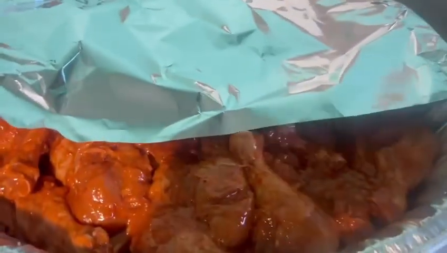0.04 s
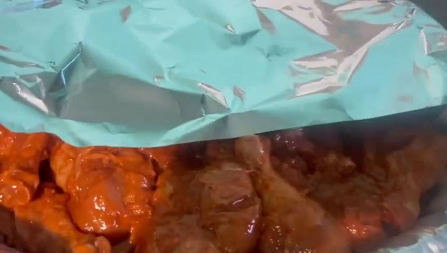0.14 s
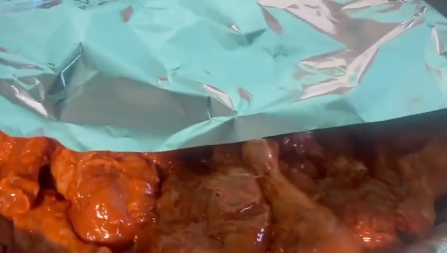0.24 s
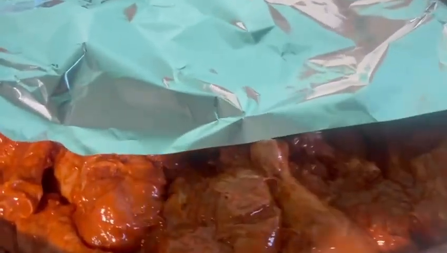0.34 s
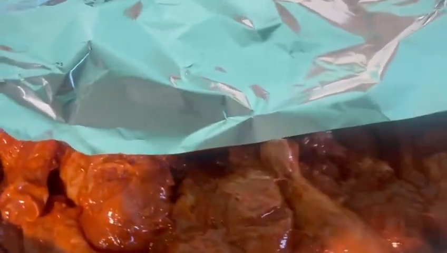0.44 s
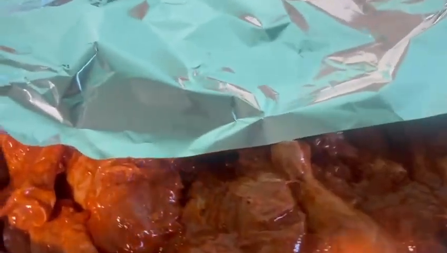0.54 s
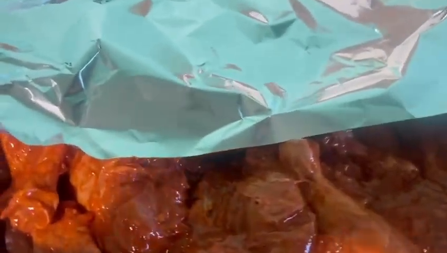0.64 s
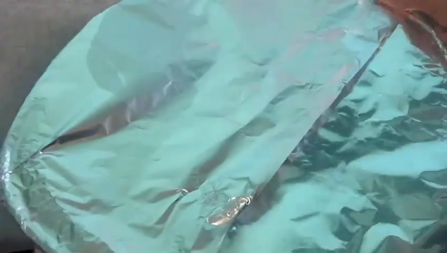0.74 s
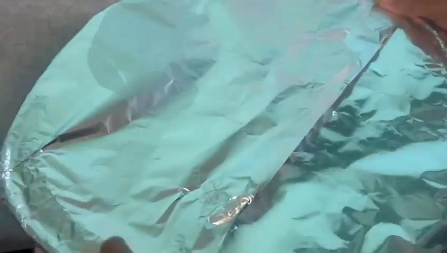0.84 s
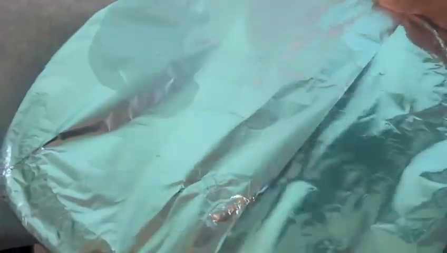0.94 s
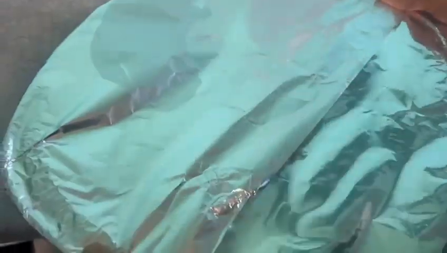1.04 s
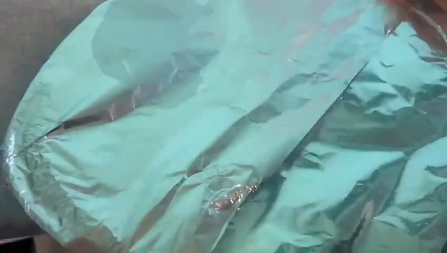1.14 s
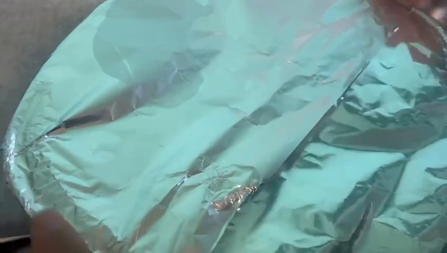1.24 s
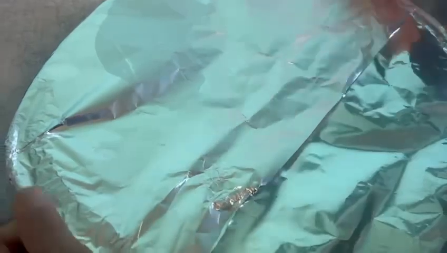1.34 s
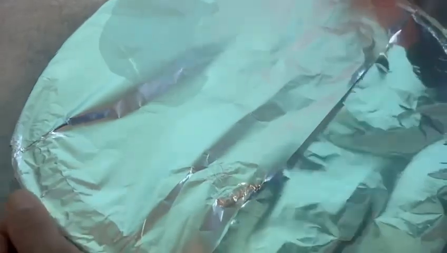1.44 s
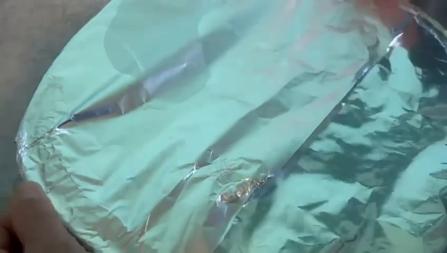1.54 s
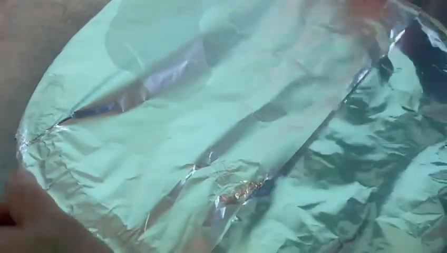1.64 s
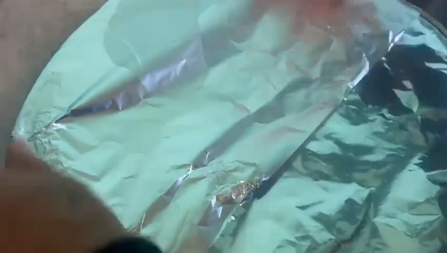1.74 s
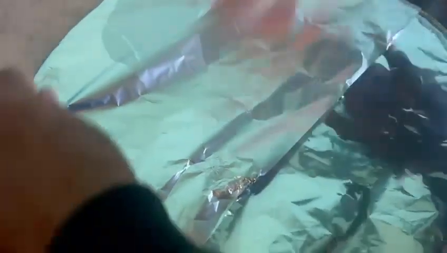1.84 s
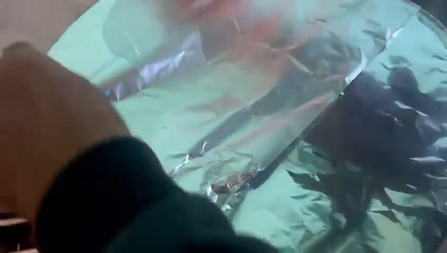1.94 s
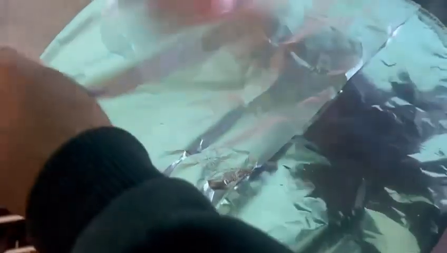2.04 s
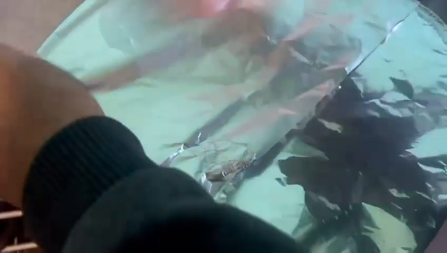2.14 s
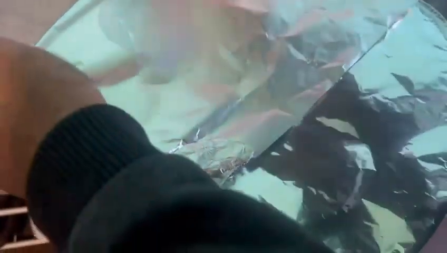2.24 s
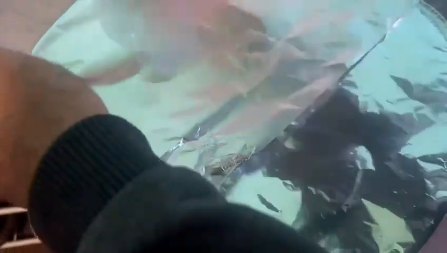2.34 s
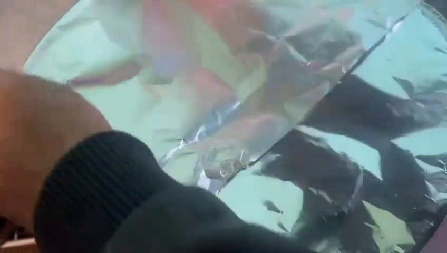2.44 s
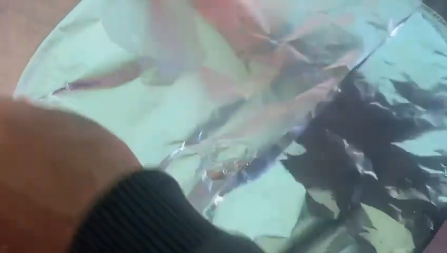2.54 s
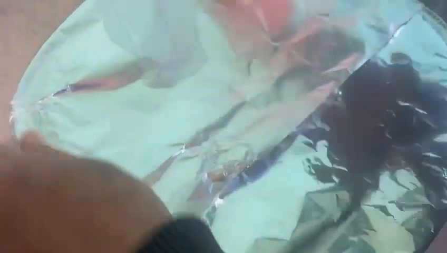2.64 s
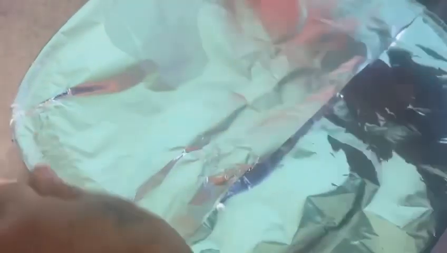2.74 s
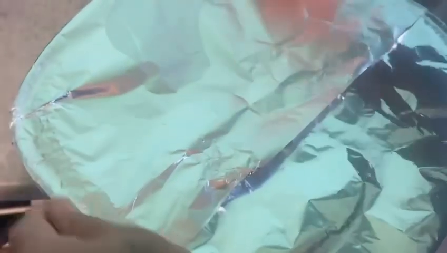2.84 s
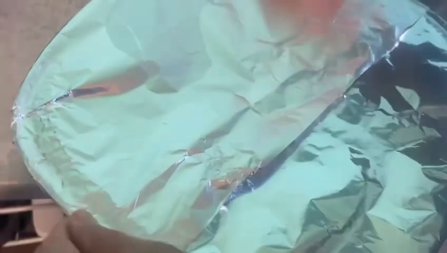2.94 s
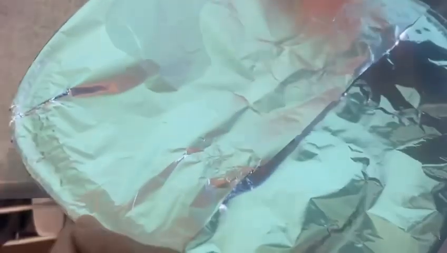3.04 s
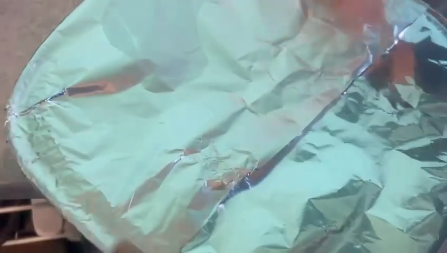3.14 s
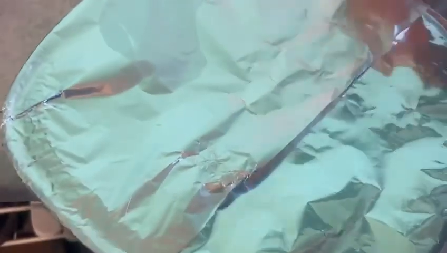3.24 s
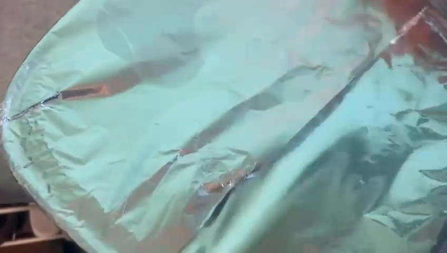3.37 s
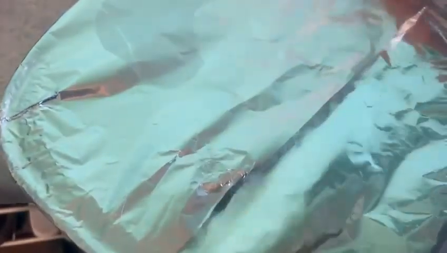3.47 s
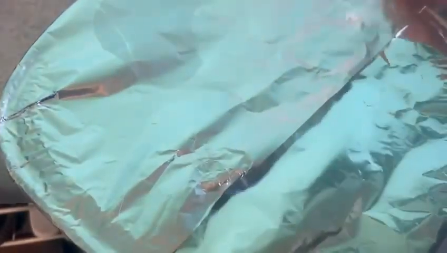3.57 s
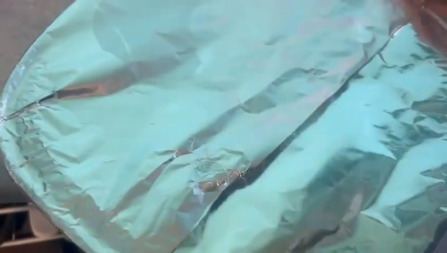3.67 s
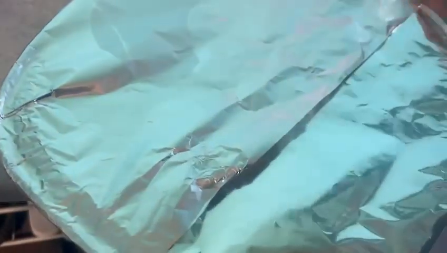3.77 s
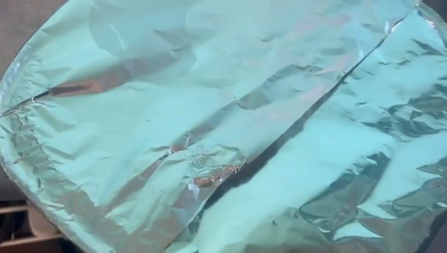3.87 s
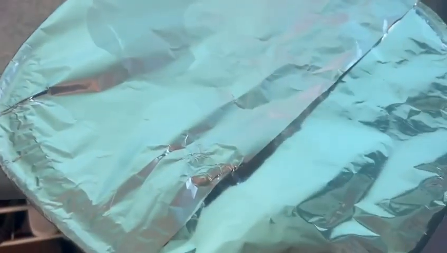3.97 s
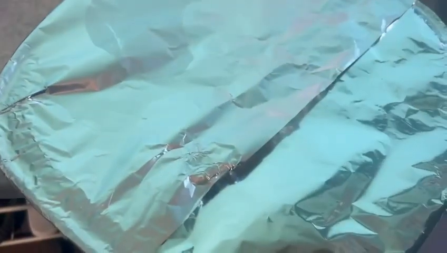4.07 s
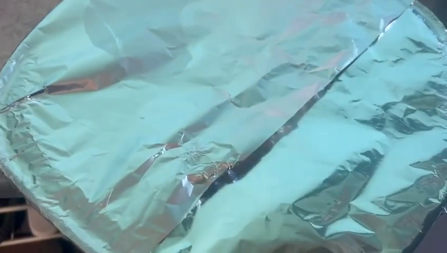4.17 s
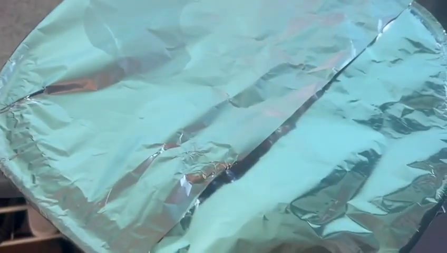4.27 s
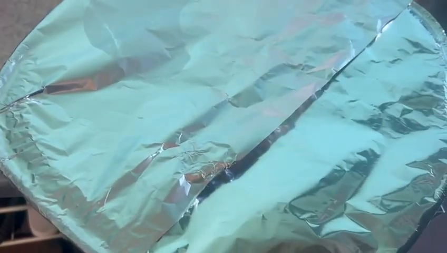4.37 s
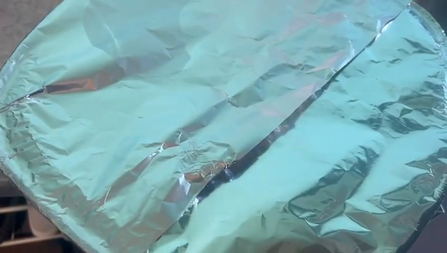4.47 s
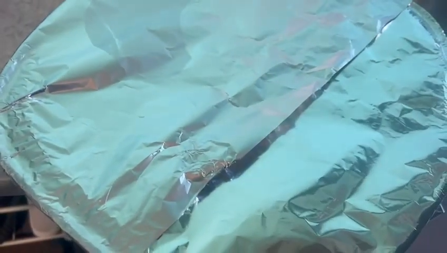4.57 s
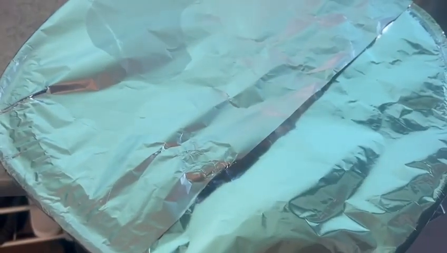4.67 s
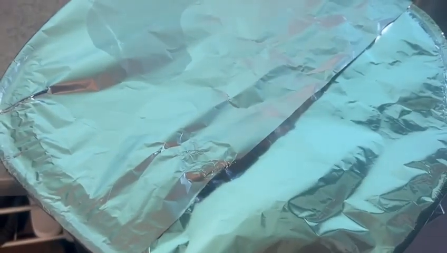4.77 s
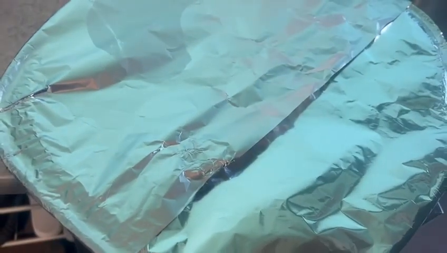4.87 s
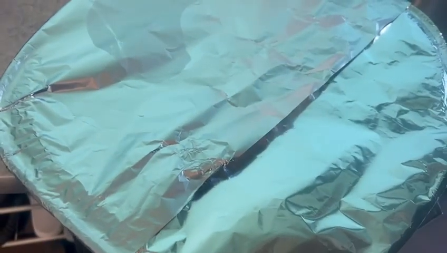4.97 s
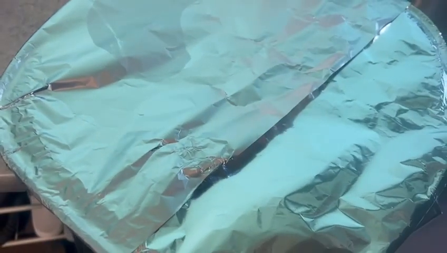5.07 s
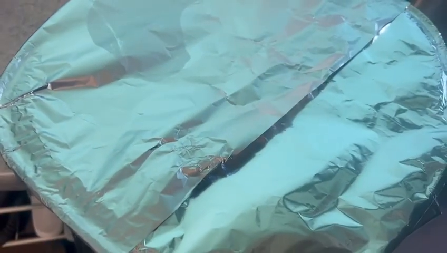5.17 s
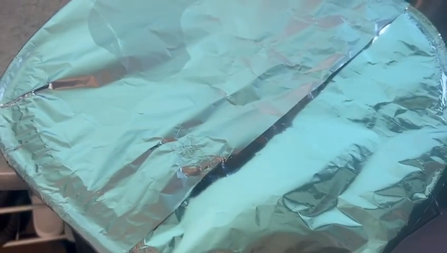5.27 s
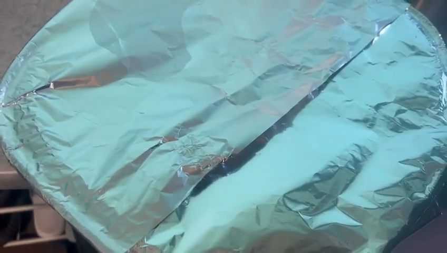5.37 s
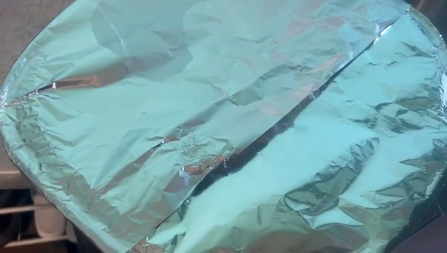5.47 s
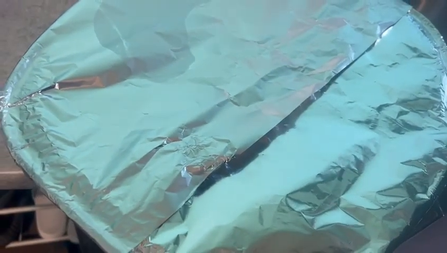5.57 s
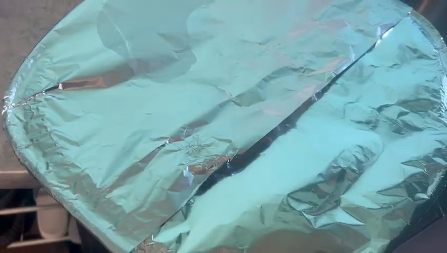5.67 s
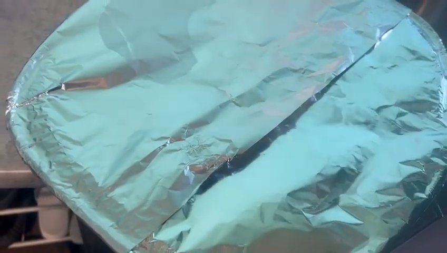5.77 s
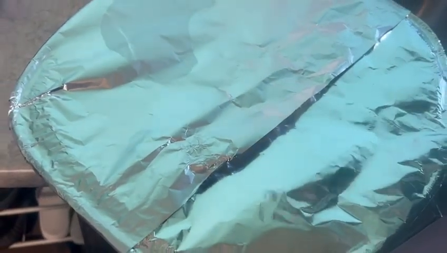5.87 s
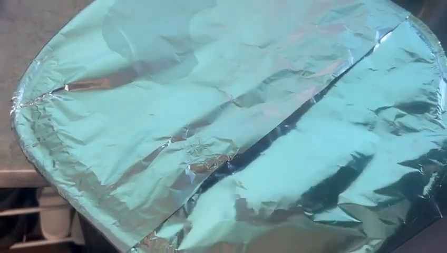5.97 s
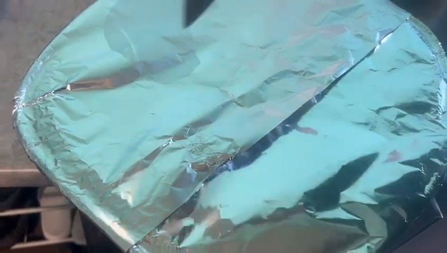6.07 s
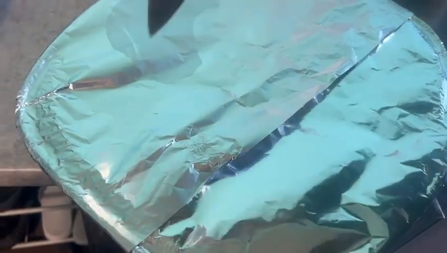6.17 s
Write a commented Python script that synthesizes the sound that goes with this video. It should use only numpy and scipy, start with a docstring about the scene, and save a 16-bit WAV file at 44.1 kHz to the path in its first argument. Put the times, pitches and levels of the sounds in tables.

```python
"""A small kitchen, the microphone close to a tray of aluminium foil, a fridge humming farther off.
After a few faint ticks the sound cuts to a brief silence and resumes with a fan running. Hands spread
the foil and crimp it round the rim: each press sets off tiny buckles, creases snap and dents pop.
Past four seconds a cupboard door knocks shut across the room and its panel rings. Thin metal then
scrapes and rings over there, and at the end the foil is touched again, close up."""
import sys
import numpy as np
from scipy import signal
from scipy.fft import rfft, irfft, next_fast_len
from scipy.io import wavfile
from scipy.ndimage import uniform_filter1d, map_coordinates

SR = 44100
rng = np.random.default_rng(int(sys.argv[2]) if len(sys.argv) > 2 else 0)


def master(y):
    """Save y as 16-bit WAV."""
    cut = np.clip(np.atleast_2d(y).T, -1, 1)
    pcm = np.round(cut * 32767)  # scale
    wavfile.write(sys.argv[1], SR, pcm.astype(np.int16))


N = 273861

# Room tone before the fan, and the fan's rush of air. Each row: frequency in Hz, relative level in dB.
ROOM_TONE_SPECTRUM = [(20, -34), (45, -19), (75, -1), (100, 1.5), (135, -14.5), (240, -7), (300, -7.5),
                      (380, -19), (550, -20), (1200, -29), (3000, -40.5), (8000, -44), (9500, -71.5)]
FAN_RUSH_SPECTRUM = [(20, -28.5), (40, -15), (62, -4.5), (85, -2), (120, -5.5), (170, -12.5), (250, -4.5),
                     (330, -9.5), (420, -13), (560, -17), (800, -22.5), (1200, -24.5), (2000, -32),
                     (4000, -42), (8000, -45), (10000, -81.5)]
# Motor tones across the room. Each row: frequency in Hz, base level in dB.
FRIDGE_TONES = [(96, -63.5), (188, -69), (285, -55.5)]
FAN_TONES = [(109.5, -50), (264, -53.5), (393, -64), (522, -69.5)]
# The fan's hum swells and sinks. Each row: time in seconds, gain in dB.
FAN_SWELL = [(0.7, 0.5), (1.2, 0.5), (2.0, 1.5), (2.8, -1), (3.4, -8), (4.0, -5.5), (4.6, 4), (5.2, -0.5),
             (6.21, 4.5)]

# Fingers press the foil, close up. Each row: start in seconds, length in seconds,
# crackle level in dB, flexing of the sheet in dB relative to the crackle.
FOIL_PRESSES = [(-0.02, 0.029, -52, 0.5), (0.675, 0.067, -33, -6), (0.72, 0.13, -33, -5),
                (0.874, .06, -20.5, -8), (0.925, .085, -24.5, -10), (1.054, 0.12, -26.5, -11),
                (1.294, 0.019, -34.5, -15), (1.328, 0.054, -33, -8), (1.417, 0.034, -18.5, -12),
                (1.431, 0.097, -22, -12.5), (1.591, 0.059, -27.5, -8), (1.668, 0.017, -26, -12.5),
                (1.791, 0.021, -33, -7), (1.985, 0.02, -29, -5), (1.991, 0.21, -25.5, -7.5),
                (2.003, 0.052, -20.5, -9.5), (2.136, 0.21, -26.5, -10.5), (2.329, .092, -23, -10),
                (2.427, 0.1, -25, -13), (2.545, .1, -24.5, -8), (2.675, .033, -27, -7),
                (2.738, 0.031, -28, -7), (2.769, 0.1, -37, 0), (2.925, 0.01, -34, -6.5),
                (2.959, .039, -37.5, -3), (3.068, 0.058, -38.5, -4), (3.17, .045, -44.5, 3),
                (3.215, .11, -25.5, -8), (3.333, 0.058, -20, -9), (3.391, 0.1, -30.5, -11.5),
                (3.492, 0.027, -27, -15.5), (3.6, 0.056, -31, -10.5), (3.69, 0.061, -24.5, -14),
                (3.732, 0.071, -35.5, -12.5), (5.772, .04, -52.5, 3), (5.934, .045, -44.5, -2.5),
                (5.975, 0.019, -33, -9), (6.068, 0.036, -29.5, -13), (6.128, 0.041, -37.5, -7.5)]
# Single creases snap through. Each row: start in seconds, relative level in dB.
CREASE_SNAPS = [(0.289, -58), (0.7143, -27), (1.1688, -16), (1.3027, -17), (1.3416, -15), (1.4474, -8),
                (1.6395, -8), (2.8537, -18), (2.866, -18), (2.93, -16.5), (2.987, -24), (3.062, -26),
                (3.1009, -21), (3.1294, -20.5), (3.2398, -18), (3.6283, -19), (3.714, -8.5), (5.9823, -22),
                (5.9943, -13), (6.0696, -20)]
# Tiny facets crinkle and the wider sheet flexes. Each row: frequency in Hz, relative level in dB.
CRINKLE_SPECTRUM = [(700, -41.5), (1500, -11.5), (2300, -5), (3300, -3), (4400, -1.5), (5500, -3),
                    (6600, -1.5), (7600, 1), (8500, 0.5), (9400, -2), (10800, -2.5), (11600, -2),
                    (12200, -31.5)]
FLEX_SPECTRUM = [(80, -17), (200, -0.5), (400, -5), (550, -3.5), (850, -1), (1250, 0.5), (1800, -6),
                 (2600, -5.5), (5000, -17.5)]
# Sheet and tray pop in and out. Each row: start in seconds, level in dB,
# a pitch in Hz that the note falls through, thud in dB relative to the note.
DENT_POPS = [(0.151, -51, 1600, -15), (0.29, -47, 1200, -12), (0.371, -50, 1150, -6),
             (0.385, -61, 1090, -10), (0.564, -52, 1390, -12), (0.7975, -17.5, 1204, -5.5),
             (0.9, -25.5, 1240, -18), (1.533, -19.5, 1720, -21), (2.712, -28.5, 700, -4),
             (2.751, -25.5, 1260, -8), (2.796, -28, 990, -5), (2.933, -25.5, 1310, -5.5),
             (3.245, -26, 770, -11.5), (3.303, -26, 1220, -22.5), (3.348, -21, 900, -18),
             (5.532, -33, 1250, 4), (6.154, -35.5, 1230, -10)]

# The far door meets its frame, slams and rattles. Each row: start in seconds, relative level in dB,
# thump trim in dB, treble trim in dB.
DOOR_CONTACTS = [(4.342, -31, 9.5, 3), (4.382, -10.5, -25, -4), (4.389, -3, -20.5, 1.5),
                 (4.397, -14, 7, -8), (4.411, -13, -2, 6), (4.577, -24.5, -22, -11),
                 (4.718, -35.5, -15, -20)]
# The door panel; its short-lived modes make the clack.
# Each row: frequency in Hz, relative level in dB, seconds to fall 60 dB.
DOOR_MODES = [(136, -7.5, 0.16), (247.5, -1, 0.26), (326.2, 0.5, 0.25), (507, -5.5, 0.27), (820, -4, 0.36),
              (1162, -6, .36), (1232, 9, 0.1), (1259, 9.5, 0.16), (1450, 3, 0.2), (1520, -8, 0.32),
              (1723, -6, .18), (1800, 1, 0.046), (1854, -0.5, 0.18), (1980, -15, 0.324), (2587, -6.5, 0.19),
              (2600, 4, 0.044), (2708, -19, .2), (3070, -11, 0.18), (4406, -10.5, 0.17), (5900, -16, .22),
              (6740, -20, .15), (7000, -13, .12), (7560, -0.5, 0.13)]
# Contact noise and low thump of the door. Each row: frequency in Hz, relative level in dB.
CRACK_SPECTRUM = [(200, -34), (600, -13), (980, -4), (1250, 0.5), (1550, -10.5), (1900, -1.5), (2250, -14),
                  (2650, -8.5), (3500, -18), (5100, -24), (5900, -17), (6800, -23), (7700, -15.5),
                  (9500, -21.5), (11500, -39), (12200, -59)]
THUMP_SPECTRUM = [(40, -23), (110, -6), (170, -0.5), (250, -9.5), (350, -4.5), (500, -4.5), (620, -8),
                  (1200, -22), (4000, -60)]

# The thin metal's ring. Each row: frequency in Hz, relative level in dB, seconds to fall 60 dB.
METAL_MODES = [(2143, 1, 1), (2220, -13, .7), (3560, -5, 1.06), (4303, 3, 0.55), (4850, -10, .25),
               (5150, -5, 0.35), (5940, -3.5, 0.16), (7900, -3, 0.23), (8740, -5, 0.18)]
# Its rasp as it slides. Each row: frequency in Hz, relative level in dB.
RASP_SPECTRUM = [(500, -4.5), (1300, -10.5), (2200, -8.5), (3700, -9), (4350, -3.5), (4750, -6), (5150, -2),
                 (5500, -3), (5950, 1), (6400, -4), (8700, 0), (11000, -2), (12200, -11.5)]

# The kitchen's reverberation. Each row: frequency in Hz, seconds to fall 60 dB.
KITCHEN_DECAY = [(150, 0.27), (500, 0.52), (2000, 0.48), (5000, 0.5), (11000, 0.17)]
# How alike the microphone's two ports hear close and far sounds.
# Each row: frequency in Hz, likeness from 0 to 1.
CLOSE_LIKENESS = [(100, .975), (260, .9), (600, .72), (1200, .65), (1800, .33), (2600, .55), (3800, .92),
                  (5100, .3), (6000, .85), (7100, .55), (8200, .97), (8550, .995), (9150, .6), (9700, .97),
                  (10200, .998), (10600, .98), (11100, .6), (11700, .97)]
FAR_LIKENESS = [(100, 0.99), (260, 0.91), (420, 0.73), (700, 0.4), (1200, 0.4), (2100, .35), (3500, 0.5),
                (5200, 0.5), (7100, .4), (8400, .85), (9200, .5), (10200, .95), (11200, .5)]
# Phase between the ports. Each row: frequency in Hz, lead of the left in radians.
LEFT_LEAD = [(300, 0), (950, .4), (3500, .1), (4600, .1), (5200, -.6), (6000, .1), (7200, .6), (8450, 0),
             (8800, -.25), (9650, -2.9), (10200, -3.14), (10650, -3.35), (11250, -6.2)]
# The foil's balance at the microphone. Each row: frequency in Hz, left minus right in dB.
FOIL_BALANCE = [(100, 0.5), (260, -3), (680, -2.5), (1100, 2), (1800, 4), (2900, 2.5), (4800, 1),
                (12000, -1)]

SILENCE_FROM_S, SILENCE_TO_S = 0.668, 0.714
TOP_HZ = 12250


def amp(db):
    """Decibels to gain."""
    return 10 ** (np.asarray(db) / 20)


def unit(x):
    """Scale to rms 1."""
    return x / np.sqrt(np.mean(x ** 2) + 1e-20)


def along(points, hz):
    """Read (Hz, value) points on a log frequency axis."""
    freqs, values = np.transpose(points)
    return np.interp(np.log(hz + 1), np.log(freqs + 1), values)


def wobble(rate):
    """A smooth random curve, rate knots a second."""
    return map_coordinates(rng.standard_normal(int(N * rate / SR) + 4), [np.arange(N) * rate / SR])


def filtered(x, response):
    """Apply a response given as a function of Hz."""
    size = next_fast_len(N + SR // 4)
    return irfft(rfft(x, size) * response(np.fft.rfftfreq(size, 1 / SR)), size)[..., :N]


def excite(x, ring):
    """Drive an impulse response, scaled to unit energy, with x."""
    return signal.fftconvolve(x, ring[None] / np.linalg.norm(ring), axes=1)[:, :N]


def coloured(x, spectrum, size=4096):
    """Pass x through a causal filter of unit energy with the given spectrum."""
    cepstrum = irfft(np.log(amp(along(spectrum, np.fft.rfftfreq(size, 1 / SR))) + 1e-6))
    cepstrum[1:size // 2] *= 2
    cepstrum[size // 2 + 1:] = 0
    return excite(x, irfft(np.exp(rfft(cepstrum))))


def add(track, start, sound):
    """Mix a short sound into a track at start seconds."""
    part = track[:, max(round(start * SR), 0):][:, :sound.shape[-1]]
    part += sound[..., :part.shape[-1]]


def centred(x):
    """A sound in the middle of the microphone's image: all mid, no side."""
    return np.array([x, np.zeros_like(x)])


def kitchen(x, wet_db):
    """Add the kitchen's reverberation, each frequency dying at its own speed."""
    hz, t, noise = signal.stft(rng.standard_normal((2, SR // 2)), SR, nperseg=256)
    decay = amp(-60 * t / along(KITCHEN_DECAY, hz)[:, None])
    tail = signal.istft(noise * decay * (1 - np.exp(-t / 0.005)), SR, nperseg=256)[1]
    return x + amp(wet_db) * signal.fftconvolve(x, tail / np.linalg.norm(tail[0]), axes=1)[:, :N]


def motor_hum(tones, drift_rad):
    """Motor tones, each drifting in phase and fluttering by about 1 dB."""
    t = np.arange(N) / SR
    return sum(np.sqrt(2) * amp(db + wobble(5.7)) * np.sin(2 * np.pi * hz * t + drift_rad * wobble(5))
               for hz, db in tones)


def appliances():
    """Across the room a fridge hums throughout; after the brief silence a fan hums and rushes too."""
    t = np.arange(N) / SR
    room_tone = amp(-49.5) * coloured(rng.standard_normal((2, N)), ROOM_TONE_SPECTRUM)
    rush = amp(-44) * coloured(rng.standard_normal((2, N)), FAN_RUSH_SPECTRUM) * amp(0.54 * wobble(6))
    swell = amp(np.interp(t, *np.transpose(FAN_SWELL), left=-120, right=-120))
    fridge = motor_hum(FRIDGE_TONES, drift_rad=0.14)
    fan = swell * motor_hum(FAN_TONES, drift_rad=0.88)
    return np.where(t > SILENCE_FROM_S, rush, room_tone) + centred(fridge + fan)


def press(start, length, fall_db_per_s):
    """Gain of one press: the force builds for about two thirds of it, holds, and the foil settles."""
    t = np.arange(N) / SR - start
    return np.clip(t / (0.66 * length), 0, 1) * amp(-fall_db_per_s * np.clip(t - length, 0, 1))


def snap_shower(per_second, spread_db, t60, facets=12):
    """A shower of tiny snaps, rms 1; each excites one of several facets with its own brief ring."""
    t = np.arange(SR // 25) / SR
    chance = np.clip(per_second / SR, 0, 1)
    fires = rng.random(N) < chance
    strength = amp(spread_db * np.clip(rng.standard_normal(N), -2, 2)) / np.sqrt(chance)
    hits = fires * strength * rng.choice([-1, 1], N)
    struck = rng.integers(facets, size=N)
    rings = rng.standard_normal((facets, 2, len(t))) * amp(-60 * t / t60)
    return unit(sum(signal.oaconvolve((hits * (struck == k))[None], rings[k], axes=1)[:, :N]
                    for k in range(facets)))


def shifting_folds(x, patch_bins, patch_frames=12, depth_db=2):
    """The colour drifts in patches as folds open and close."""
    spectra = signal.stft(x, nperseg=256)[2]
    patches = rng.standard_normal(spectra.shape[1:])
    for _ in range(2):
        patches = uniform_filter1d(uniform_filter1d(patches, patch_bins, 0), patch_frames, 1)
    return unit(signal.istft(spectra * amp(depth_db * unit(patches)), nperseg=256)[1][:, :N])


def foil():
    """Close up, harder pressing buckles more facets at once; the wider sheet flexes below them."""
    crackle_power, flex_power = np.zeros((2, N))
    for start, length, db, flex_db in FOIL_PRESSES:
        crackle_power += (amp(db) * press(start, length, fall_db_per_s=275)) ** 2
        flex_power += (amp(db + flex_db) * press(start, length, fall_db_per_s=158.5)) ** 2
    crackle, flex = np.sqrt(crackle_power), np.sqrt(flex_power)
    buckles_per_s = 250 + 2200 * crackle / amp(-28)
    fine = snap_shower(buckles_per_s, spread_db=2, t60=0.023, facets=24)
    fine = shifting_folds(fine, patch_bins=9) * amp(0.84 * wobble(70))
    wide = snap_shower(150 + buckles_per_s / 2, spread_db=4, t60=0.045, facets=24)
    wide = shifting_folds(wide, patch_bins=3)
    creases = crease_snaps()
    bright = coloured(amp(0.01) * crackle * fine + creases, CRINKLE_SPECTRUM)
    body = coloured(amp(-0.1) * flex * wide + amp(-12) * creases, FLEX_SPECTRUM)
    return kitchen(bright + body, wet_db=-12)


def dent_pops():
    """A dent flips by the microphone: a brief falling hollow note, then a soft thud of the tray."""
    t = np.arange(SR // 10) / SR
    track = np.zeros((2, N))
    lowpass = signal.butter(2, 2500, fs=SR)
    glide = 0.783 + 0.5 * np.exp(-t / 0.0025)
    for start, db, hz, thud_db in DENT_POPS:
        note = np.sin(2 * np.pi * hz * np.cumsum(glide) / SR) * amp(-60 * t / 0.028)
        grit = signal.lfilter(*lowpass, rng.standard_normal((2, len(t)))) * amp(-60 * t / 0.042)
        thud = np.sin(2 * np.pi * 290 * t) * amp(thud_db - 60 * t / 0.039)
        add(track, start, amp(db) * (centred(note) + 0.71 * grit))
        add(track, start + 0.005, amp(db) * centred(thud))
    return kitchen(track, wet_db=-11.5)


def crease_snaps(t60=0.036):
    """Single creases in the foil snap through, each a short burst of noise."""
    t = np.arange(SR // 10) / SR
    track = np.zeros((2, N))
    for start, db in CREASE_SNAPS:
        add(track, start, amp(db - 12 - 60 * t / t60) * rng.standard_normal((2, len(t))))
    return track


def cupboard_door():
    """Across the kitchen, each contact cracks, rings the panel at new strengths and thumps the frame."""
    t = np.arange(SR // 2) / SR
    crack, ring, thump = np.zeros((3, 2, N))
    hz, mode_db, t60 = np.transpose(DOOR_MODES)[:, :, None]
    lowpass = signal.butter(2, 2800, fs=SR)
    ring_attack, thump_attack = 1 - np.exp(-t / 0.00088), 1 - np.exp(-t / 0.00095)
    for start, db, thump_db, treble_db in DOOR_CONTACTS:
        strength = amp(mode_db + treble_db * (hz > 3500) + 0.97 * rng.standard_normal(hz.shape))
        modes = np.sum(strength * np.sin(2 * np.pi * hz * t) * amp(-60 * t / t60), axis=0)
        add(ring, start, amp(db - 22.5) * centred(modes * ring_attack))
        noise = rng.standard_normal((2, len(t)))
        dull = signal.filtfilt(*lowpass, noise)
        contact = dull + amp(treble_db) * (noise - dull)  # a softer contact carries less treble
        add(crack, start, amp(db - 7 - 60 * t / 0.052) * contact)
        thump_gain = amp(db + thump_db - 9.5 - 60 * t / 0.06) * thump_attack
        add(thump, start, thump_gain * rng.standard_normal((2, len(t))))
    impacts = coloured(crack, CRACK_SPECTRUM) + coloured(thump, THUMP_SPECTRUM)
    return ring + kitchen(impacts, wet_db=-5.5)


def slide(from_s, catch_s, lift_s, grow_db_per_s=40, fall_db_per_s=184):
    """Gain of the scrape: it grows as the metal speeds up, catches once and fades as it lifts off."""
    t = np.arange(N) / SR
    grown_db = grow_db_per_s * (np.clip(t, from_s, lift_s) - from_s)
    faded_db = fall_db_per_s * np.maximum(t - lift_s, 0)
    catch = (t > catch_s) * amp(-31.5 - 60 * np.clip(t - catch_s, 0, 1) / 0.06)
    return (t > from_s) * amp(-46 + grown_db - faded_db) + catch


def metal_scrape():
    """Thin metal slides farther off: fine slips rasp and feed beating mode pairs and brief high modes."""
    t = np.arange(SR) / SR
    slips = slide(from_s=5.159, catch_s=5.35, lift_s=5.424) * snap_shower(3000, spread_db=3, t60=0.0087)
    ring = np.zeros(SR)
    for hz, db, t60 in METAL_MODES:
        twin_hz = hz + rng.uniform(9.5, 20)
        pair = np.sin(2 * np.pi * hz * t) + 0.52 * np.sin(2 * np.pi * twin_hz * t)
        ring += amp(db - 60 * t / t60) * pair
    high_hz = rng.uniform(2510, 12000, size=(70, 1))
    high_modes = np.sin(2 * np.pi * high_hz * t).sum(axis=0) * amp(-60 * t / 0.053)
    rasp = coloured(amp(-1) * slips + amp(-5.5) * excite(slips, high_modes), RASP_SPECTRUM)
    return kitchen(rasp + amp(-9) * excite(slips, ring), wet_db=-11)


def microphone(pair, likeness):
    """Two unrelated signals become left and right, alike and out of step as the two ports make them."""
    angle = lambda hz: np.arccos(np.clip(along(likeness, hz), 0, 1)) / 2
    mid, side = filtered(pair, lambda hz: np.array([np.cos(angle(hz)), np.sin(angle(hz))]))
    phase_shift = lambda hz: np.exp(1j * np.outer([0.5, -0.5], along(LEFT_LEAD, hz)))
    return filtered(np.array([mid + side, mid - side]), phase_shift)


def scene():
    """From the microphone: the foil lies close and a little to the left, the rest farther off."""
    close = microphone(foil() + dent_pops(), CLOSE_LIKENESS)
    close = filtered(close, lambda hz: amp(np.outer([0.5, -0.5], along(FOIL_BALANCE, hz))))
    far = microphone(cupboard_door() + metal_scrape() + appliances(), FAR_LIKENESS)
    return close + far


def record(dry):
    """The sound cuts to a brief silence at an edit, with 2 ms fades; the treble ends at TOP_HZ."""
    t = np.arange(N) / SR
    audible = uniform_filter1d(1.0 * ((t < SILENCE_FROM_S) | (t > SILENCE_TO_S)), size=90)
    return filtered(dry * audible, lambda hz: 1 / np.sqrt(1 + (hz / TOP_HZ) ** 200))


dry = scene()
out = record(dry)
master(out)
```